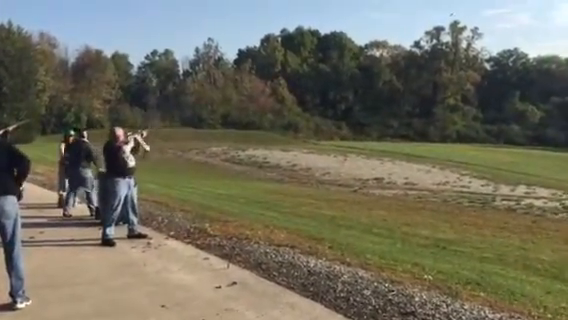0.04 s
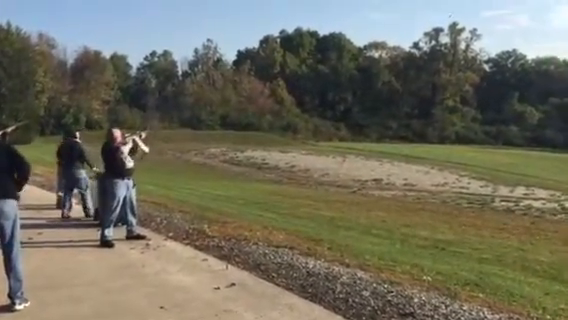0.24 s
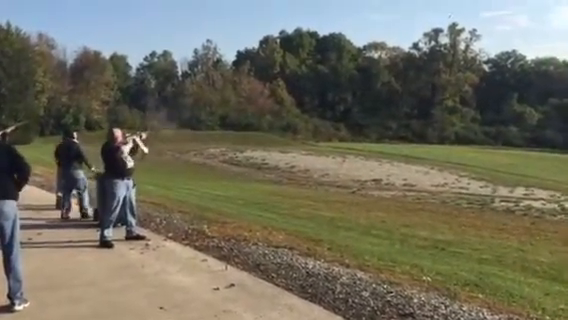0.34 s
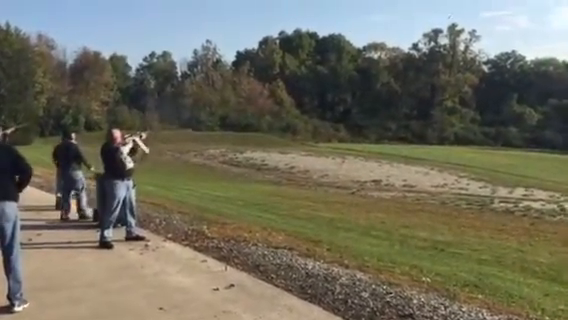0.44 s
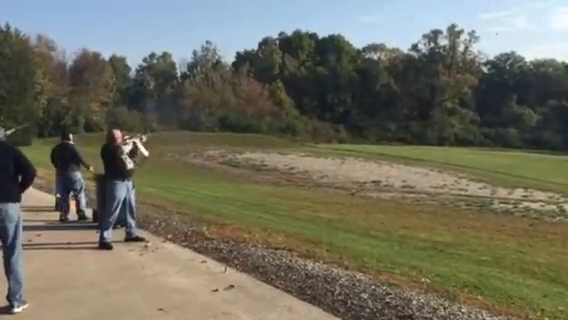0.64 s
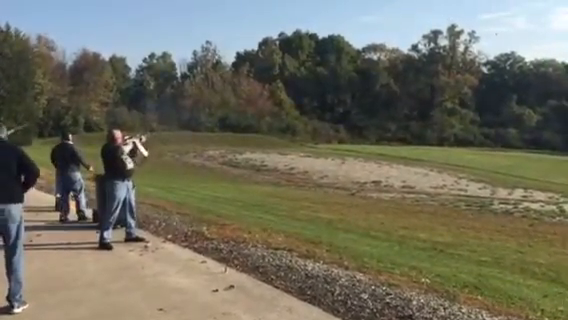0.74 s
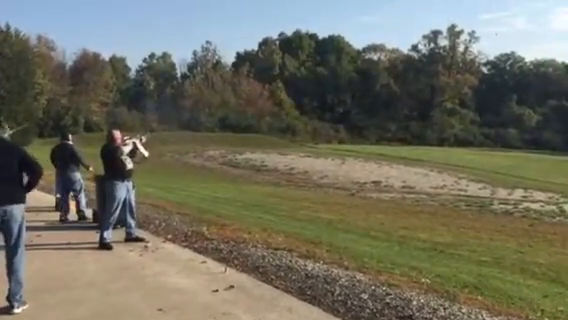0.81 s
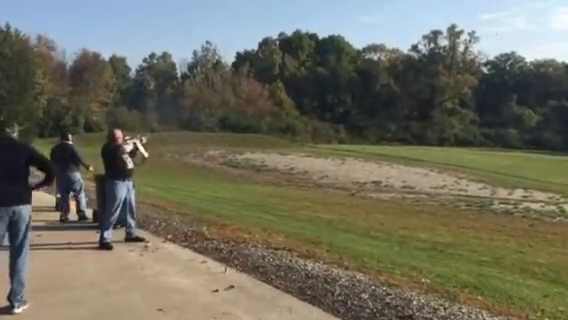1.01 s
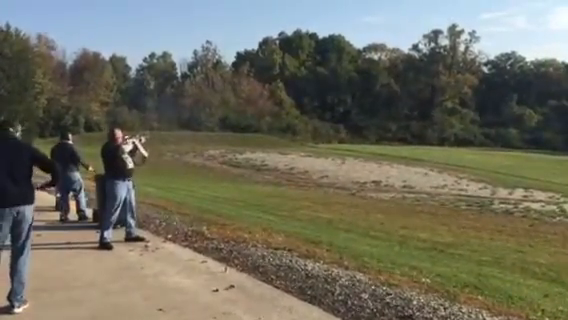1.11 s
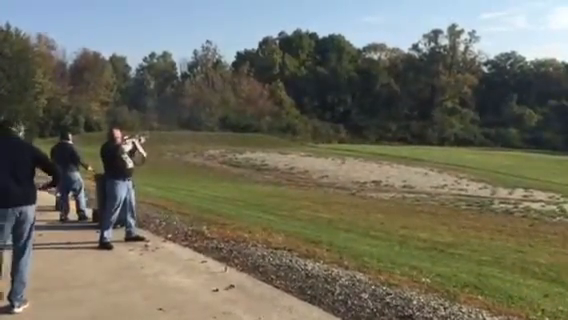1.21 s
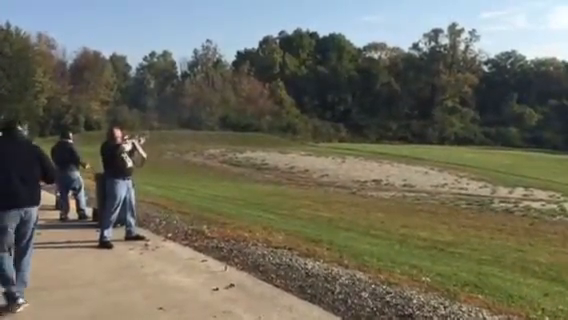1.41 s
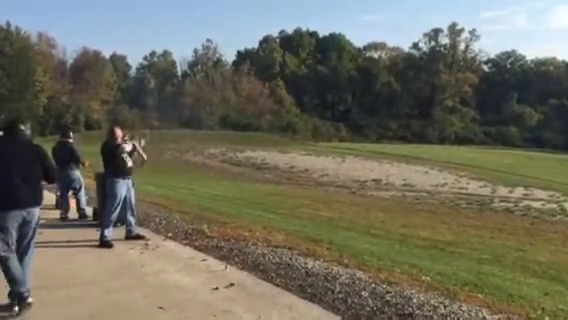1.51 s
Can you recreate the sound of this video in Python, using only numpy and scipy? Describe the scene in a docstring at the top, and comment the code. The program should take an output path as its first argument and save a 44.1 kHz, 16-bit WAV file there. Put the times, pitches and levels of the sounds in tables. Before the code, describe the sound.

Four shotgun blasts go off a few metres away on an open range, at about 0.2, 0.55, 0.9 and 1.25 seconds, the first the heaviest. Each is a sharp crack with a low thump that overloads the microphone, with a tiny tick just before it. The field returns a brief hiss, and from about 0.4 seconds a rolling echo from distant trees carries on to the end over faint, still air.

```python
"""Four quick shotgun blasts a few metres away on an open clay range, each led in by a tick
and a brief hollow swell. A blast is milliseconds of violent pressure swings, then a low gas
push; it overloads the microphone. The pavement and firing line scatter it, the field hisses
back for a tenth of a second, banks return dull slaps, and the far tree line returns a long
rolling echo. Still outdoor air lies underneath."""
import sys
import numpy as np
from scipy import signal
from scipy.fft import rfft, irfft
from scipy.io import wavfile

SR = 44100
rng = np.random.default_rng(int(sys.argv[2]) if len(sys.argv) > 2 else 0)


def wav_out(sig):
    """Save sig, one row per channel (or a flat mono array), as 16-bit PCM at SR to the path in sys.argv[1]."""
    wavfile.write(sys.argv[1], SR, np.round(np.clip(np.atleast_2d(sig).T, -1, 1) * 32767).astype(np.int16))


N = 68355

# Shots: start_s, blast_db, hold_s, near_db, near_tilt_db_per_oct, push_db, push_hz,
# field_db, field_tilt_db_per_oct, woods_db, lead_db
SHOTS = [(.2213, -1, .007, 7.5, .3, 7.5, 116, 1, 1, 3, 12),
         (0.538, -1, 0.0043, 3, -0.5, -7, 148, 0, 0, -3.5, 1),
         (0.8839, -1, 0.0047, -2, -0.5, -1.5, 121, 1.5, 0, 0.5, 1),
         (1.2496, -1.5, .0037, -2.5, 0.5, 2, 91, 1.5, 0, 0, 0.5)]
def shotgun():
    """Each shot with its near scatter and distant echoes; the distant ones carry no deep bass."""
    (starts_s, blast_db, holds_s, near_db, near_tilts, push_db, push_hz,
     field_db, field_tilts, woods_db, lead_db) = np.transpose(SHOTS)
    near = pavement_scatter(near_tilts)
    field = field_scatter(field_tilts)
    woods = woods_echo(rise_s=.0036, hold_s=.11)
    deep_woods = woods_echo(rise_s=.012, hold_s=.036)
    single_echoes = close_reflections() + bank_slaps()
    close, far = np.zeros((2, N))
    for k, (start_s, hold_s) in enumerate(zip(starts_s, holds_s)):
        add(close, start_s - LEAD_S, amp(lead_db[k]) * lead_in())
        add(close, start_s, amp(blast_db[k]) * muzzle_blast(hold_s))
        add(close, start_s + hold_s / 2, amp(near_db[k]) * near[k])
        add(close, start_s + hold_s + .00094, amp(push_db[k]) * gas_push(push_hz[k]))
        add(far, start_s, amp(field_db[k]) * (field[k] + single_echoes))
        add(far, start_s + .212, amp(woods_db[k] - 40.5) * woods[k])
        add(far, start_s + .53, amp(-44.5) * deep_woods[k])
    bass_cut = signal.butter(2, 81, "high", fs=SR, output="sos")
    return close + signal.sosfilt(bass_cut, far)


# Blast spectrum, hollow resonances near 1, 1.5 and 2.6 kHz: freq_hz, density_db
BLAST_SPECTRUM = [(40, -39), (200, -12.5), (600, -4), (800, -4), (1040, 6), (1250, -8), (1560, 5.5),
                  (1980, -9), (2300, -2.5), (2700, -2.5), (3200, -15.5), (4000, -14), (8000, -16),
                  (16000, -23.5)]
def muzzle_blast(hold_s):
    """A few milliseconds of violent pressure swings from the muzzle, of steady strength."""
    swings = colour(even_noise(), BLAST_SPECTRUM)
    shape = envelope(rise_s=.00048, hold_s=hold_s, t60_s=.0081)
    rms = np.sqrt(np.average(swings ** 2, weights=shape ** 2))
    return swings * shape / rms


def gas_push(pitch_hz):
    """Low suction and rebound after the blast; a deeper one lasts longer."""
    t = np.arange(N) / SR
    shape = envelope(rise_s=.00072, hold_s=0, t60_s=2.57 / pitch_hz)
    return -amp(-1.5) * np.cos(2 * np.pi * pitch_hz * t) * shape


LEAD_S = .024
# Swell spectrum: freq_hz, density_db
LEAD_SPECTRUM = [(60, -7), (200, -9), (750, -12), (1120, -1), (1350, -7.5), (1800, -11.5), (2800, -23.5),
                 (3400, -34), (16000, -48.5)]
def lead_in():
    """A hollow swell that grows up to the blast."""
    ramp = np.linspace(-1, 0, round(LEAD_S * SR))
    swell = amp(-21.5 + 18.5 * ramp) * np.sqrt(1 + ramp)
    return swell * colour(even_noise(), LEAD_SPECTRUM)[:len(ramp)]


# Ticks: start_s, level_db
TICKS = [(0.2007, -24.5), (0.2027, -24), (0.535, -30), (0.881, -22.5), (1.2472, -28)]
# Tick spectrum: freq_hz, density_db
TICK_SPECTRUM = [(100, -11), (1200, 10.5), (2600, 6), (4000, -9), (8000, -6.5), (16000, -24)]
def ticks():
    """Sharp ticks just ahead of the blasts."""
    out = np.zeros(N)
    shape = envelope(rise_s=.0002, hold_s=.0006, t60_s=.013)
    for start_s, level_db in TICKS:
        add(out, start_s, amp(level_db) * colour(even_noise(), TICK_SPECTRUM) * shape)
    return out


# Near scatter: freq_hz, density_db, t60_s
PAVEMENT_BANDS = [(25, -27, .09), (49.6, 1.5, .12), (135, -2, 0.15), (297, 10, 0.11), (480, 2.5, 0.11),
                  (850, 1.5, 0.089), (1700, -4.5, 0.063), (3460, -11, 0.087), (8550, -15.5, 0.13),
                  (15800, -25, 0.16)]
def pavement_scatter(tilts):
    """The pavement and firing line scatter each blast at once."""
    return amp(-12.5) * diffuse_echoes(PAVEMENT_BANDS, tilts, rise_s=.0013, hold_s=.0077)


# Sharp reflections: delay_s, level_db
REFLECTIONS = [(.0105, -15.5), (0.0158, -20.5), (.0245, -21), (0.087, -38)]
# Reflection spectrum: freq_hz, density_db
REFLECTION_SPECTRUM = [(100, 9), (700, 2), (1600, 6.5), (3500, -5), (8000, -14.5), (16000, -11)]
def close_reflections():
    """Single sharp echoes of a blast from close by."""
    out = np.zeros(N)
    shape = envelope(rise_s=.00018, hold_s=.0005, t60_s=.021)
    for delay_s, level_db in REFLECTIONS:
        add(out, delay_s, amp(level_db) * colour(even_noise(), REFLECTION_SPECTRUM) * shape)
    return out


# Field scatter: freq_hz, density_db, t60_s
FIELD_BANDS = [(30, -34, .4), (93, 0, 0.49), (210, 4, 1), (294, 2, 1), (594, 4.5, 0.37), (1040, -0.5, 0.33),
               (1960, -0.5, 0.33), (3800, -5, 0.26), (8400, -11.5, 0.29), (16000, -20, 0.19)]
def field_scatter(tilts):
    """The open field returns each blast as a swelling hiss."""
    return amp(-29.5) * diffuse_echoes(FIELD_BANDS, tilts, rise_s=.055, hold_s=.026)


# Slaps: delay_s, level_db, pitch_hz
SLAPS = [(.056, -36.5, 210), (0.133, -35.5, 177), (.222, -47, 110), (0.252, -41, 200), (.279, -42, 130.3)]
def bank_slaps(width_s=.0075):
    """Soft, low single echoes from banks and the edge of the woods."""
    out = np.zeros(N)
    for delay_s, level_db, pitch_hz in SLAPS:
        t = np.arange(N) / SR - delay_s
        out += amp(level_db) * np.sin(2 * np.pi * pitch_hz * t) * np.exp(-(t / width_s) ** 2)
    return out


# Echo from the trees: freq_hz, density_db, t60_s
WOODS_BANDS = [(30.4, -35, 0.91), (94, 9, 0.75), (152, -12, 3.4), (287, 6.5, 1.25), (507, 2, 4.1),
               (965, -0.5, 6.3), (2320, -4.5, 4.3), (4700, -14, 4.2), (8900, -20.5, 3.1),
               (16000, -34.5, 0.89)]
def woods_echo(rise_s, hold_s):
    """Far trees return each blast as a long roll."""
    return diffuse_echoes(WOODS_BANDS, np.zeros(len(SHOTS)), rise_s, hold_s)


def diffuse_echoes(bands, tilts, rise_s, hold_s, shared=.6, rise_cycles=.27):
    """One echo per tilt (dB/octave above 1 kHz), all much alike; low bands build up later."""
    common, clumps, axis = even_noise(), echo_clumps(), log_axis()
    band_hz, _, t60s_s = np.transpose(bands)
    weights = [np.interp(axis, np.log(band_hz), pick) for pick in np.eye(len(bands))]
    fades = [envelope(rise_s + rise_cycles / hz, hold_s, t60_s) for hz, t60_s in zip(band_hz, t60s_s)]
    octaves = np.maximum(axis - np.log(1000), 0) / np.log(2)
    echoes = []
    for tilt in tilts:
        pattern = clumps * (np.sqrt(shared) * common + np.sqrt(1 - shared) * even_noise())
        spectrum = rfft(colour(pattern, bands)) * amp(tilt * octaves)
        echoes.append(sum(irfft(spectrum * weight, N) * fade for weight, fade in zip(weights, fades)))
    return np.array(echoes)


def echo_clumps(depth_db=1.2, clump_s=.004):
    """Gain for quick random swells and dips in the density of echoes."""
    hz = np.fft.rfftfreq(N, 1 / SR)
    wobble = irfft(rfft(rng.standard_normal(N)) * np.exp(-(hz * clump_s) ** 2), N)
    return amp(depth_db * wobble / wobble.std())


# Air spectrum: freq_hz, density_db
AIR_SPECTRUM = [(15, -60), (25, -35), (45, -14), (66, -7), (108, -15.5), (451, -27.5), (659, -31),
                (3720, -38), (16000, -55)]
def still_air():
    """Faint, steady rumble of outdoor air."""
    return amp(-60.5) * colour(rng.standard_normal(N), AIR_SPECTRUM)


def even_noise():
    """Noise with its energy spread evenly over time and pitch, at rms 1."""
    noise = rng.standard_normal(N)
    for size in (1024, 128, 512):
        cells = signal.stft(noise, nperseg=size)[2]
        noise = signal.istft(cells / (abs(cells) + 1e-12), nperseg=size)[1][:N]
    return noise / noise.std()


def colour(white, table):
    """Gives noise a spectrum, at rms 1."""
    hz, db = np.transpose(table)[:2]
    gain = amp(np.interp(log_axis(), np.log(hz), db))
    noise = irfft(rfft(white) * gain, N)
    return noise / noise.std()


def envelope(rise_s, hold_s, t60_s):
    """Linear attack, hold, exponential release."""
    t = np.arange(N) / SR
    release = np.exp(-np.log(1000) * np.maximum(t - rise_s - hold_s, 0) / t60_s)
    return np.minimum(t / rise_s, 1) * release


def log_axis():
    """Log frequency of every bin."""
    return np.log(np.fft.rfftfreq(N, 1 / SR) + 1)


def amp(db):
    """Decibels to gain."""
    return 10 ** (np.asarray(db) / 20)


def add(mix, start_s, sound):
    """Mixes a sound in at a time."""
    part = mix[max(round(start_s * SR), 0):][:len(sound)]
    part += sound[:len(part)]


def scene():
    """Shots, echoes and ticks over still air, in mono."""
    return (still_air() + shotgun() + ticks())[None]


def record(dry, ceiling=.71, knee=8, cutoff_hz=16100):
    """The microphone overloads with a firm knee; a low-pass follows."""
    clipped = dry / (1 + abs(dry / ceiling) ** knee) ** (1 / knee)
    low_pass = signal.firwin(255, cutoff_hz, window=("kaiser", 8), fs=SR)
    return signal.oaconvolve(clipped, low_pass[None], "same")


dry = scene()
out = record(dry)
wav_out(out)
```